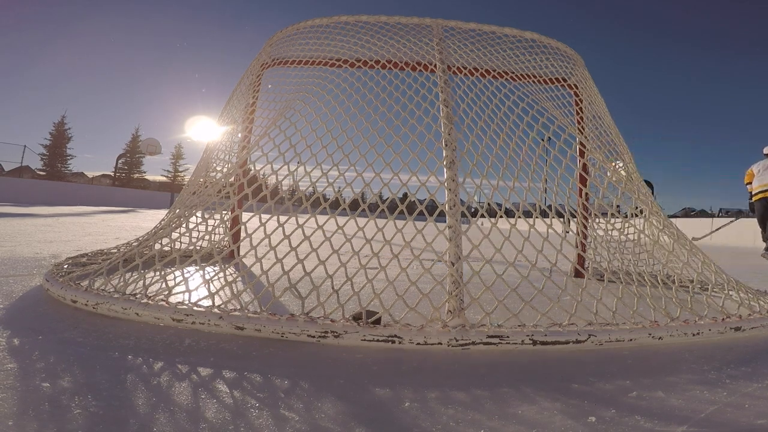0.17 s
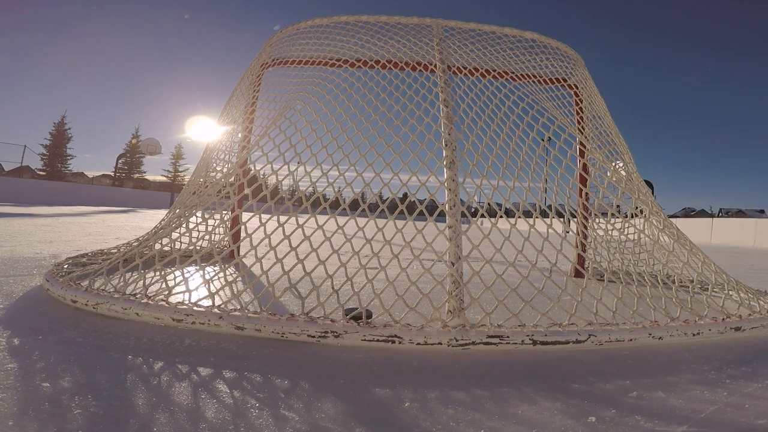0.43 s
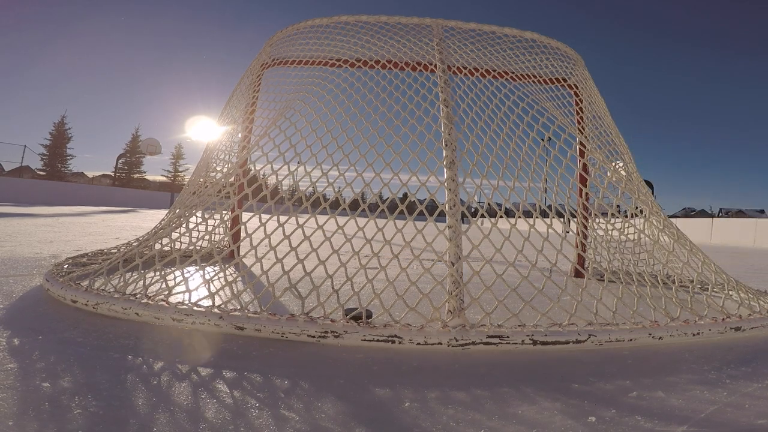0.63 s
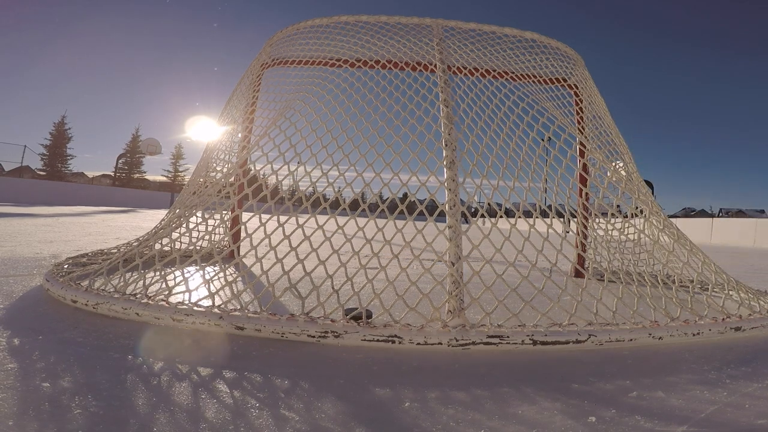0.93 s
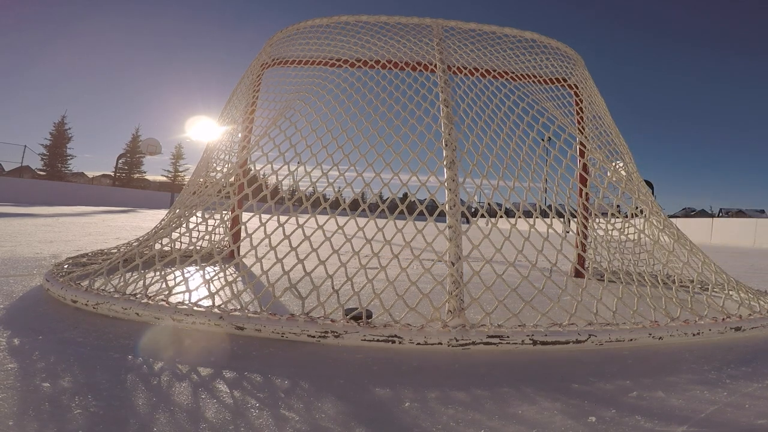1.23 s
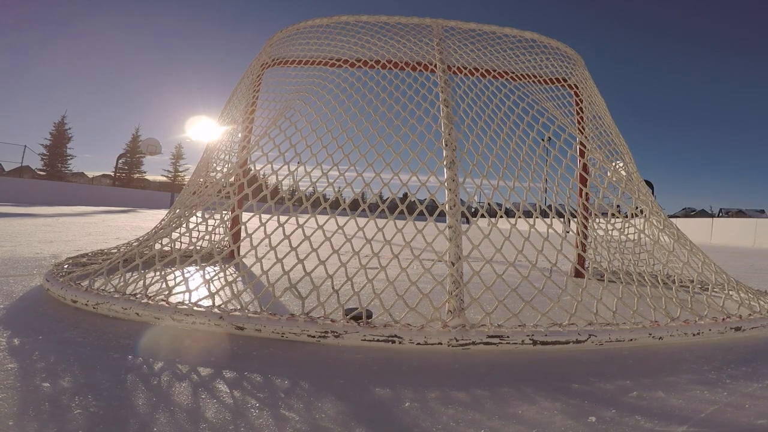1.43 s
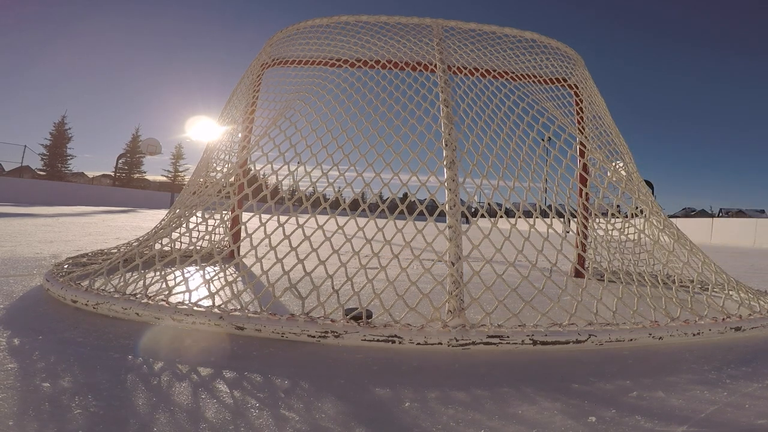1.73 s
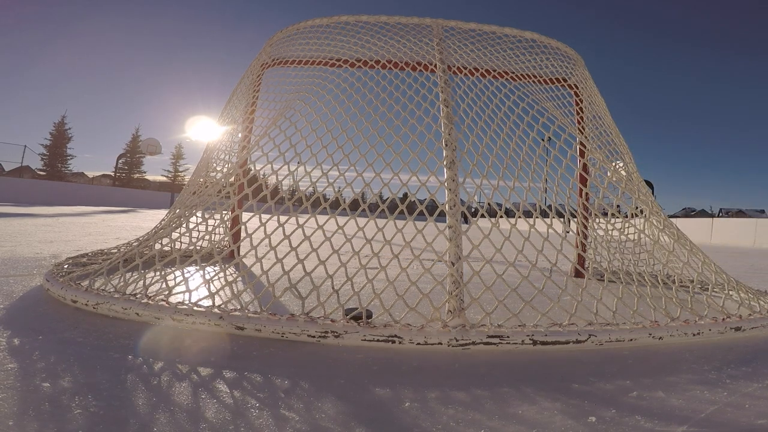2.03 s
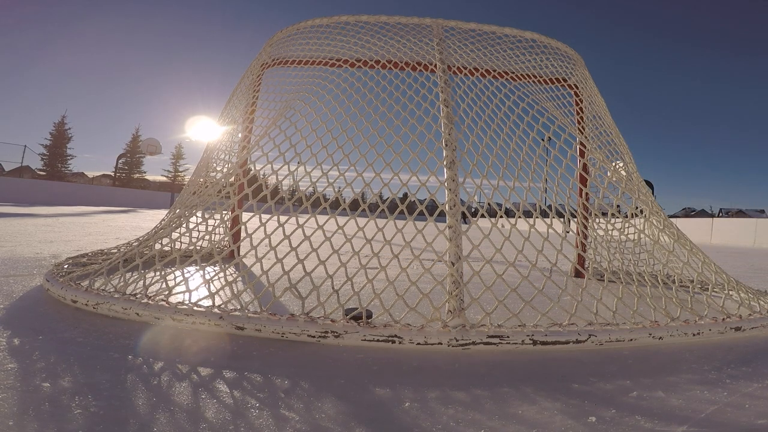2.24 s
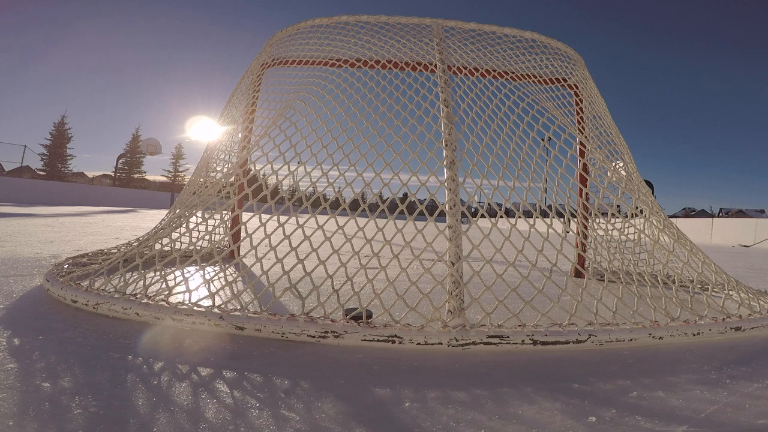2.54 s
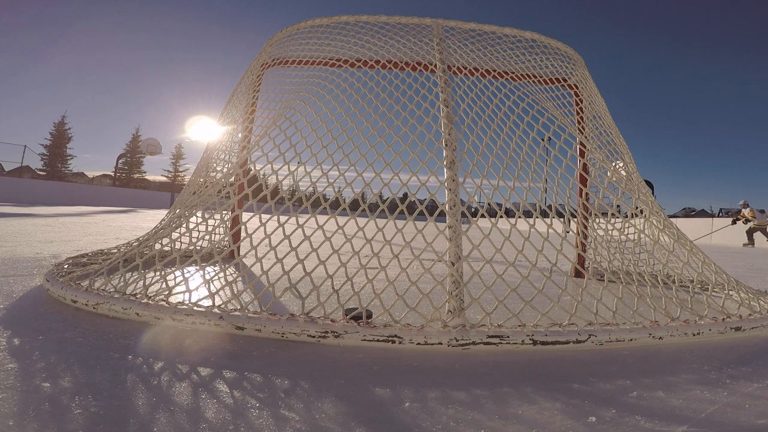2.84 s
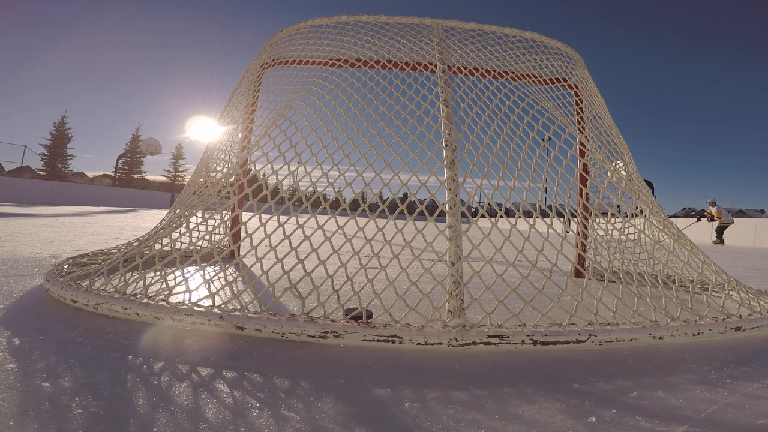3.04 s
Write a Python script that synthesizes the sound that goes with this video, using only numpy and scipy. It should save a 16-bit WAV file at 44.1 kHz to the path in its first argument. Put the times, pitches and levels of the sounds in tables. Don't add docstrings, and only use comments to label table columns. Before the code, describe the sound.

A skate blade on the right carves a long, rasping, half-singing scrape with icy spray, then breaks into short scratchy strides and chips, over steady low wind rumble at an open rink, microphone on the ice.

```python
import sys
import numpy as np
from scipy import signal
from scipy.fft import rfft, irfft, next_fast_len
from scipy.io import wavfile

SR = 44100
rng = np.random.default_rng(int(sys.argv[2]) if len(sys.argv) > 2 else 0)


def ratio_of_db(decibels):
    return 10 ** (np.asarray(decibels, float) / 20)


def to_wav(s):
    ch = np.atleast_2d(s).T
    pcm = np.round(np.clip(ch, -1, 1) * 32767)
    wavfile.write(sys.argv[1], SR, pcm.astype(np.int16))


N = 141120

# (frequency [Hz], density [dB per Hz])
WIND_SPECTRUM = [(24, -11), (35, 3), (60, -1.5), (100, -9.5), (160, -12.5), (400, -22.5), (1500, -37.5),
                 (4000, -57.5)]
# (time [s], first-order frequency [Hz], first-order level [dB], second-order level [dB])
ENGINE_ORDERS = [(0.0, 40.26, -23.5, -60), (0.31, 44, -38, -36), (0.84, 45.74, -53, -32.5),
                 (1.18, 42.21, -34, -26), (2.0, 43.7, -21.5, -26), (2.04, 43.4, -17.5, -35.5),
                 (2.28, 44.95, -24.5, -24.5), (2.77, 48.83, -19.5, -37.5), (3.2, 50.7, -45, -35)]
# (frequency [Hz], level [dB])
PLANT_HUM = [
    (58.5, -30.5),
    (117, -40.5),
    (294, -44),
]
# (time [s], level [dB])
FAR_GLIDE = [(0, -26.5), (.07, -42.5), (1.3, -30.5), (1.52, -27), (1.7, -31), (2.0, -39.5), (2.08, -39.5),
             (2.125, -37), (2.3, -27), (2.44, -24), (2.55, -29), (2.86, -29), (2.9, -27), (2.935, -32),
             (2.975, -24), (3.05, -23), (3.12, -24), (3.2, -29.5)]
# (frequency [Hz], width [Hz], level [dB])
FAR_BLADE_MODES = [(317, 105, -3), (590, 292, 0.5), (900, 242, 4), (1420, 460, -2), (2170, 964, -5.5),
                   (2840, 1500, -15)]
# (time [s], peak level [dB], pitch [Hz], ringing [cycles])
FAR_ICE_CHIPS = [(2.885, -20, 900, 6), (2.894, -15, 1200, 4), (2.899, -18, 1000, 5), (2.903, -18, 1300, 6),
                 (2.969, -18, 2000, 4), (2.988, -16, 1450, 5)]
# (time [s], blade pressure [dB], spray above it [dB], sheet rumble above it [dB])
CARVE_CONTACT = [(.11, -25.5, -7.5, -4), (.19, -22, -5, -14.5), (.34, -20.5, -2, -4.5),
                 (.47, -22.5, -2, -6.5), (.6, -21.5, -1.5, -7.5), (.7, -22, 0.5, -10),
                 (.76, -22, -4.5, -18.5), (1.0, -22, -2, -21), (1.12, -22, -1, -13), (1.24, -21, -2, -13.5),
                 (1.33, -24.5, -5, -11.5), (1.44, -25.5, -8, -1.5)]
# (time [s], peak level [dB], pitch [Hz], ringing [cycles])
NEAR_ICE_CHIPS = [(0.104, -16, 1530, 8), (0.1042, -17, 3000, 2), (0.127, -16, 1530, 8),
                  (0.264, -11, 1670, 10), (0.434, -9, 1540, 4), (0.442, -13, 1540, 6),
                  (0.48, -12, 1050, 10), (0.855, -12, 700, 3), (1.177, -11, 900, 3), (1.284, -14, 700, 3),
                  (1.722, -12, 1050, 5), (1.7235, -13, 520, 4), (1.727, -11, 1000, 9),
                  (1.7615, -19, 900, 6), (1.7705, -19, 850, 6), (1.819, -15, 620, 4),
                  (1.8235, -15, 1400, 5), (1.836, -14, 1350, 6), (1.8395, -15, 700, 4),
                  (1.844, -16, 1700, 6), (2.401, -12, 1820, 10), (2.535, -14, 834, 5),
                  (2.589, -14, 1500, 6), (2.598, -14, 1250, 6), (2.6055, -11, 1580, 14),
                  (2.608, -15, 950, 6), (2.627, -19, 1750, 6), (2.644, -15, 1450, 6), (2.652, -12, 1460, 9),
                  (2.696, -15, 1000, 6), (2.709, -13, 1600, 14), (2.726, -15, 1500, 10),
                  (2.734, -12, 1490, 14), (2.748, -16, 1000, 6), (2.804, -7, 800, 2.5),
                  (2.8135, -10, 750, 2), (2.8183, -10, 2300, 6), (2.8215, -9, 1040, 7),
                  (2.842, -12, 2050, 5), (2.848, -14, 1200, 3), (2.8593, -11, 1000, 2.5)]
# (time [s], pitch [Hz])
LEAN_PITCH = [(.1, 1530), (.3, 1777), (.47, 1563), (.65, 1486), (.85, 1883), (1.05, 1771), (1.27, 1560),
              (1.38, 1060)]
# (time [s], pitch [Hz], level against the middle voice [dB])
HEEL_VOICE = [(.1, 950, -5), (.3, 1120, -2), (.48, 1036, -1), (.62, 1120, 2.5), (.8, 1050, -16),
              (1.1, 1088, -18), (1.3, 1103, -4), (1.42, 1016, 5)]
# (time [s], pitch [Hz], level against the middle voice [dB])
TOE_VOICE = [(.1, 2900, -3), (.2, 3200, 0), (.27, 2900, -20), (.42, 2700, -1), (.7, 2400, -10),
             (.9, 2300, -4), (1.1, 2150, -2), (1.2, 2500, -8), (1.45, 2400, -6)]
# (frequency [Hz], width [Hz], level [dB])
BLADE_MODES = [(568, 200, -9.5), (1060, 144, -0.5), (1250, 266, -1), (1530, 143, 2.5), (1902, 250, 0.5),
               (2174, 260, -2.5), (2660, 380, -4.5), (3450, 250, -6), (3940, 760, -13)]
SPRAY_MODES = [(5720, 1300, 18), (5900, 140, -6), (6240, 820, 21.5), (7700, 2700, 7), (9400, 700, -17),
               (12400, 2200, -28)]
SHEET_MODES = [(177, 35, -7.5), (246, 81, -2), (275.4, 62, 1), (410, 167, -7)]
# (start [s], length [s], level [dB], spray above it [dB], ringing pitch [Hz])
STRIDE_CONTACTS = [(1.466, 0.039, -35, -0.5, 1060), (1.645, 0.086, -33.5, -7, 1540),
                   (1.718, 0.0065, -27, -5, 1000), (1.756, 0.089, -30, -12.5, 920),
                   (1.801, 0.042, -22, -16.5, 1350), (1.864, 0.04, -35.5, -3, 1700),
                   (1.919, 0.013, -30.5, -4.5, 1496), (1.958, 0.064, -40, -2.5, 1200),
                   (2.116, 0.032, -35, -14, 1250), (2.163, 0.056, -32.5, -6, 900),
                   (2.215, 0.033, -33, -7, 900), (2.269, 0.091, -24.5, -6, 1550),
                   (2.392, 0.091, -25.5, -11, 1734), (2.513, 0.036, -25.5, -17, 900),
                   (2.571, 0.025, -26, -9.5, 1530), (2.642, 0.01, -30, -7.5, 1578),
                   (2.687, 0.06, -26.5, -14, 1520), (2.762, 0.054, -30, -9.5, 1160),
                   (2.81, 0.0071, -22, -20, 1330), (2.83, 0.031, -28.5, -37, 870)]
# (centre [s], half length [s], level [dB])
SHEET_GROANS = [
    (1.836, 0.063, -34),
    (2.19, 0.078, -29.5),
    (2.341, 0.042, -31.5),
    (2.454, 0.057, -27.5),
    (2.58, 0.076, -25.5),
    (2.82, 0.027, -51),
]
# (frequency [Hz], level [dB])
PORT_SHADOW = [(60, -8), (130, -13), (280, -2.5), (610, -18), (1330, -7.5), (2880, -26.5), (6250, -8.5),
               (13600, -18)]
# (frequency [Hz], phase [rad])
PORT_PHASE = [(0, 0), (600, -.8), (860, -4), (1210, -4.5), (3790, -5.2), (6000, -7.3), (9560, -9.5),
              (13700, -14)]

CARVE_END_S = 1.55


def rms_one(x):
    return x / np.sqrt(np.mean(x ** 2) + 1e-20)


def in_time(rows):
    s, *columns = np.transpose(rows)
    return [np.interp(np.arange(N) / SR, s, c) for c in columns]


def drift(rate_hz):
    r = np.exp(-80 * np.pi * rate_hz / SR)
    noise = rng.standard_normal(N // 40 + 2002)
    slow = signal.lfilter([1], [1, -2 * r, r * r], noise)[2000:]
    return np.interp(np.arange(N) / 40, np.arange(len(slow)), rms_one(slow))


def resonate(x, modes):
    out = 0
    for k, (hz, width_hz, db) in enumerate(modes):
        r = np.exp(-np.pi * width_hz / SR)
        poles = [1, -2 * r * np.cos(2 * np.pi * hz / SR), r * r]
        out = out + (-1) ** k * ratio_of_db(db) * signal.lfilter([1 - r * r, 0, r * r - 1], poles, x)
    return out


def grains(modes, per_s, patchy_db):
    spread_db = 3
    sizes = ratio_of_db(spread_db * np.minimum(rng.exponential(1, N), 4)) * rng.choice([-1, 1], N)
    cracks = sizes * (rng.random(N) < per_s / SR) + 1e-18
    out = 0
    for k, mode in enumerate(modes):
        out = out + ratio_of_db(patchy_db * drift(10.7)) * (-1) ** k * resonate(cracks, [mode])
    return rms_one(out)


def wind():
    wind_db, gust_db, side_db, hiss_db = -28, 1, -19, -47.5
    hz = np.maximum(np.fft.rfftfreq(N, 1 / SR), 1)
    table_hz, table_db = np.transpose(WIND_SPECTRUM)
    colour = ratio_of_db(np.interp(np.log(hz), np.log(table_hz), table_db, left=-50))
    mid, side = irfft(rfft(rng.standard_normal((2, N))) * colour, N)
    air = (mid + ratio_of_db(side_db) * side * [[1], [-1]]) / np.std(mid)
    hiss = resonate(rng.standard_normal((2, N)), [(3200, 9100, -6.5), (6400, 740, 7), (11000, 4000, -29)])
    return ratio_of_db(wind_db + gust_db * drift(0.45)) * air + ratio_of_db(hiss_db) * rms_one(hiss)


def drone():
    hz, first_db, second_db = in_time(ENGINE_ORDERS)
    turn = 2 * np.pi * np.cumsum(hz) / SR
    lead = 0.41 * np.array([[1], [0]])
    out = ratio_of_db(first_db - 1.0) * np.sin(turn + lead)
    out = out + ratio_of_db(second_db + 2) * np.sin(2 * turn + 0.82 + lead)
    for line_hz, db in PLANT_HUM:
        level = ratio_of_db(db + 5 + 0.87 * drift(1.4))
        phase = 2 * np.pi * line_hz * np.arange(N) / SR + drift(1.83)
        out = out + level * np.sin(phase + lead)
    return out


def far_skater():
    db, = in_time(FAR_GLIDE)
    gain = ratio_of_db(db + np.tanh(drift(25)))
    mid = grains(FAR_BLADE_MODES, 2500, patchy_db=1)
    side = grains(FAR_BLADE_MODES[3:], 2800, patchy_db=0.0)
    left, right = gain * (mid + ratio_of_db(-5.5) * side * [[1], [-1]]) + chips(FAR_ICE_CHIPS)
    low_mid_dip = resonate(left, [(667, 500, 0)]) / 2
    return np.array([left - low_mid_dip, right])


def singing():
    width_hz, sing_patchy_db = 90, 2.5
    middle, = in_time(LEAN_PITCH)
    low_pass = signal.butter(2, width_hz, fs=SR, output="sos")
    out = 0
    for hz, db in [(middle, 0), in_time(HEEL_VOICE), in_time(TOE_VOICE)]:
        turn = 2 * np.pi * np.cumsum(hz) / SR
        a, b = signal.sosfilt(low_pass, rng.standard_normal((2, N)) ** 3)
        voice = rms_one(a * np.cos(turn) + b * np.sin(turn))
        out = out + ratio_of_db(db + sing_patchy_db * drift(4.1)) * voice
    return (np.arange(N) < CARVE_END_S * SR) * out


def chips(rows):
    crack_hz, crack_db = 2100, -11
    out, t = np.zeros(N), np.arange(900) / SR
    for s, db, hz, cycles in rows:
        i = int((s + .0004) * SR)
        life = t * hz / cycles * 7
        ring = np.sin(2 * np.pi * hz * t) * life * np.exp(1 - life)
        burst = rng.standard_normal(len(t)) * np.exp(-t / .0006)
        crack = resonate(resonate(burst, [(crack_hz, 2200, 0)]), [(crack_hz, 2600, 0)])
        out[i:i + len(t)] += ratio_of_db(db) * (ring + ratio_of_db(crack_db) * crack / np.abs(crack).max())
    return out


def stride(t, s, length):
    attack_s, rise_share, release_s = 0.0021, 0.079, 0.015
    rise = np.clip((t - s) / (attack_s + rise_share * length), 0, 1)
    return rise * np.exp(-np.maximum(t - s - length, 0) / release_s)


def blade_ring():
    width_hz, ring_db = 190, -1
    out, t = np.zeros(N), np.arange(9000) / SR
    for s, length, db, _, hz in STRIDE_CONTACTS:
        grit = rng.standard_normal(len(t)) ** 3
        ring = rms_one(resonate(grit, [(hz, width_hz, 0)]))
        i = int(s * SR)
        out[i:i + len(t)] += ratio_of_db(db + ring_db) * stride(t, 0, length) * ring
    return out


def contact():
    t = np.arange(N) / SR
    press, spray, rumble = in_time(CARVE_CONTACT)
    on = np.clip((t - .104) / 0.0011, 0, 1) * np.clip((1.46 - t) / 0.02, 0, 1)
    out = on * ratio_of_db(np.array([press, press + spray, press + rumble]))
    for s, length, db, spray_db, _ in STRIDE_CONTACTS:
        levels = ratio_of_db(np.array([[db], [db + spray_db]]))
        out[:2] = np.maximum(out[:2], stride(t, s, length) * levels)
    for s, half, db in SHEET_GROANS:
        out[2] += ratio_of_db(db) * np.exp(-((t - s) / half) ** 2)
    return out


def near_skater():
    blade, spray, rumble = contact()
    chatter_db = 2.6 * np.tanh(drift(120))
    carve_per_s, stride_per_s = 5000, 1300
    rate = np.where(np.arange(N) < CARVE_END_S * SR, carve_per_s, stride_per_s)
    scrape = grains(BLADE_MODES, rate, patchy_db=1.5) + ratio_of_db(-5) * singing()
    out = blade * ratio_of_db(chatter_db - 1) * scrape
    out = out + spray * ratio_of_db(0.39 * chatter_db) * grains(SPRAY_MODES, 8300, patchy_db=2.0)
    out = out + rumble * grains(SHEET_MODES, carve_per_s, patchy_db=2)
    out = out + blade_ring() + ratio_of_db(2) * chips(NEAR_ICE_CHIPS)
    scattered = spray * ratio_of_db(.6 * chatter_db - 12.0) * grains(SPRAY_MODES, 6300, patchy_db=2.5)
    return out, scattered


def ports(x):
    diffuse_db, decay_samples = -8, 290.0
    size = next_fast_len(N + 4096)
    hz = np.maximum(np.fft.rfftfreq(size, 1 / SR), 1)
    shadow_hz, shadow_db = np.transpose(PORT_SHADOW)
    shade = ratio_of_db(np.interp(np.log(hz), np.log(shadow_hz), shadow_db))
    turn = np.exp(1j * np.interp(hz, *np.transpose(PORT_PHASE)))
    tail = rng.standard_normal(1300) * np.exp(-np.arange(1300) / decay_samples)
    smear = rfft(rms_one(tail) / np.sqrt(1300), size)
    scatter = ratio_of_db(diffuse_db) * smear * hz ** 2 / (hz ** 2 + 900 ** 2)
    left = irfft(rfft(x, size) * (shade * turn + scatter), size)[:N]
    return np.array([left, x])


def scene():
    direct, scattered = near_skater()
    near = ports(direct * ratio_of_db(2)) + scattered * [[1], [0]]
    return near + far_skater() + drone() + wind()


def roll_off(x):
    return signal.sosfilt(signal.butter(12, 14240, fs=SR, output="sos"), x)


def record(dry):
    dull = signal.sosfilt(signal.butter(2, [33, 8200], "band", fs=SR, output="sos"), dry)
    mix = 1.1 * np.tanh(dull / 1.1)
    return roll_off(mix)


dry = scene()
out = record(dry)
to_wav(out)
```